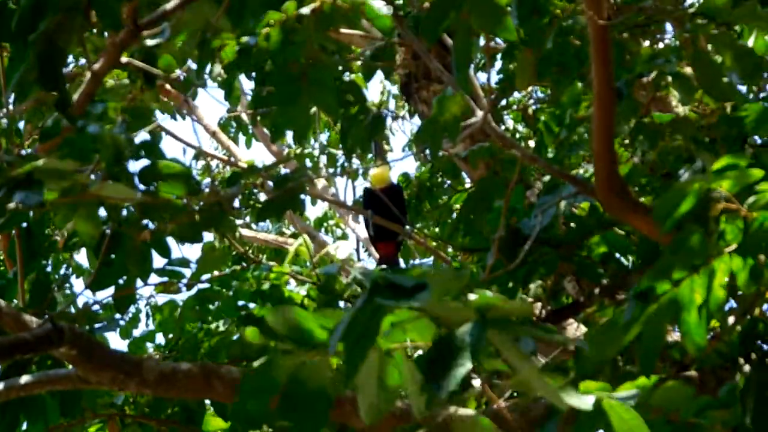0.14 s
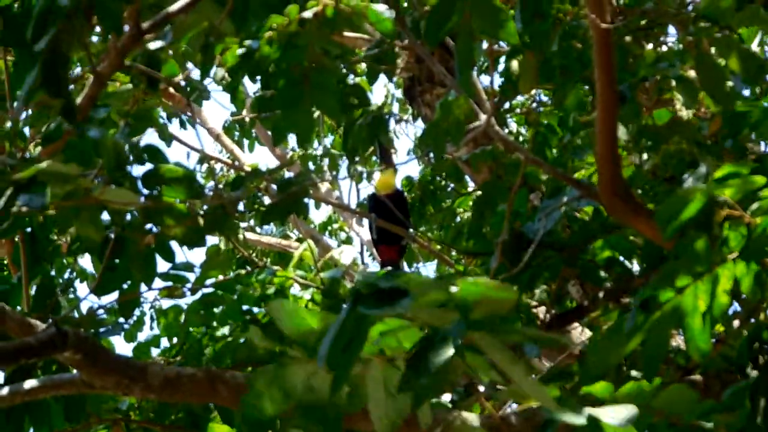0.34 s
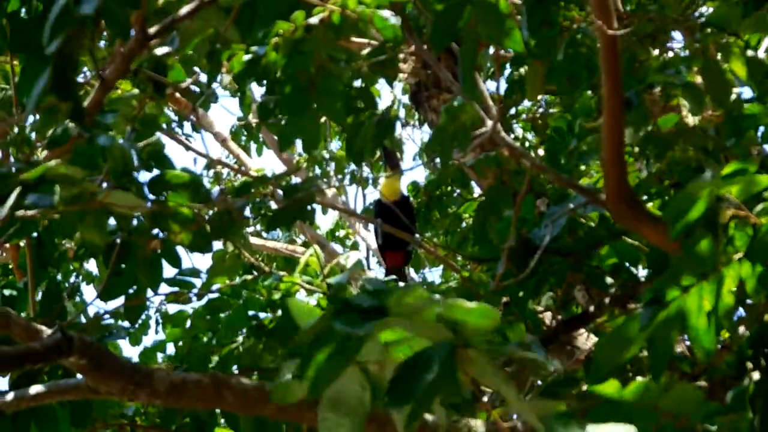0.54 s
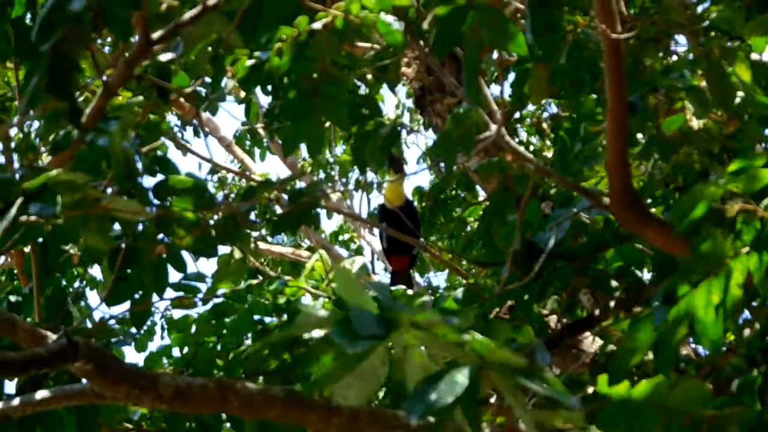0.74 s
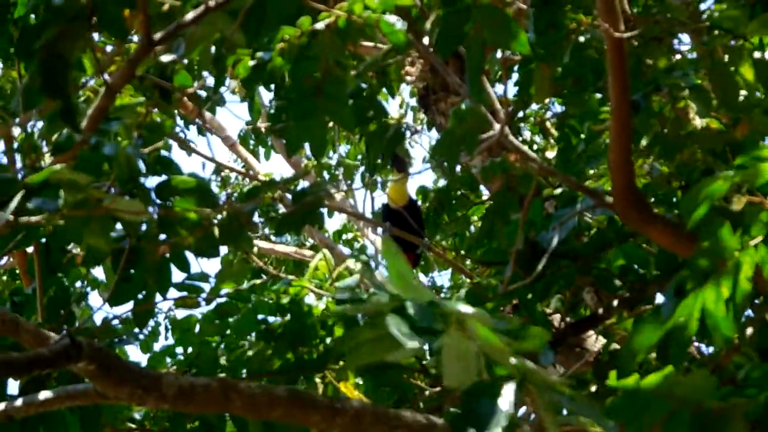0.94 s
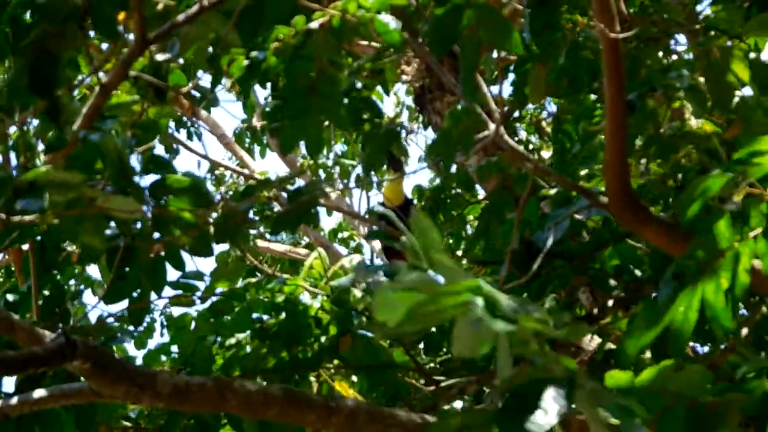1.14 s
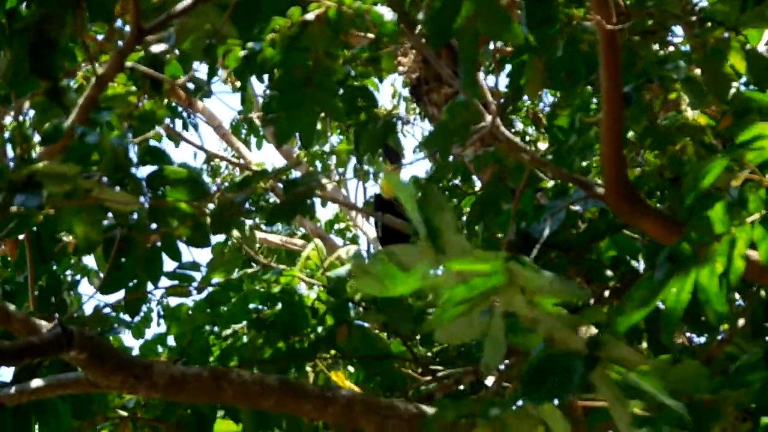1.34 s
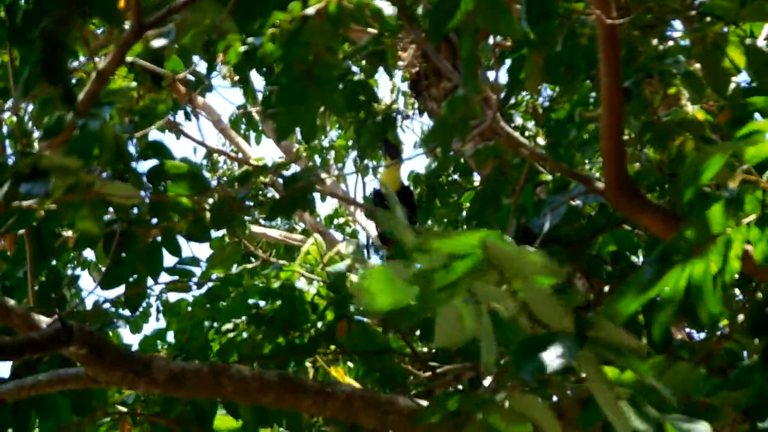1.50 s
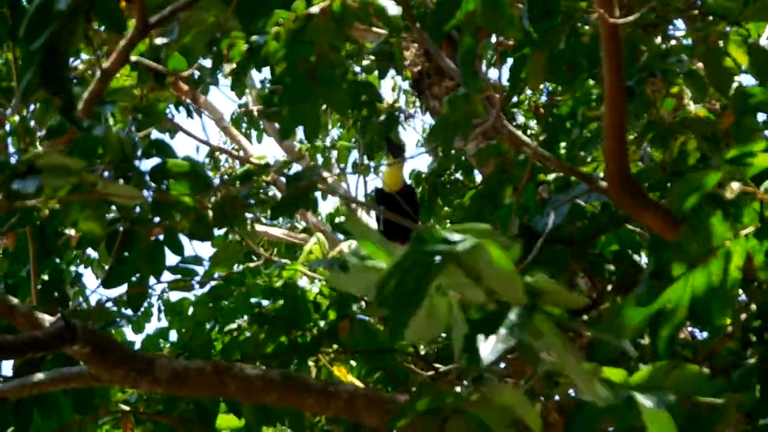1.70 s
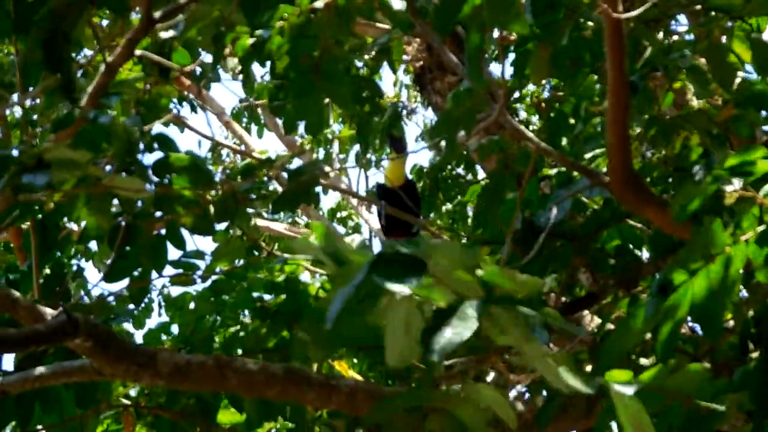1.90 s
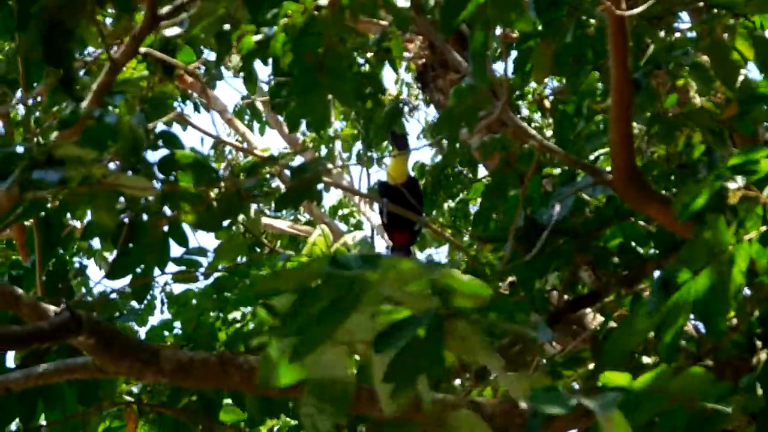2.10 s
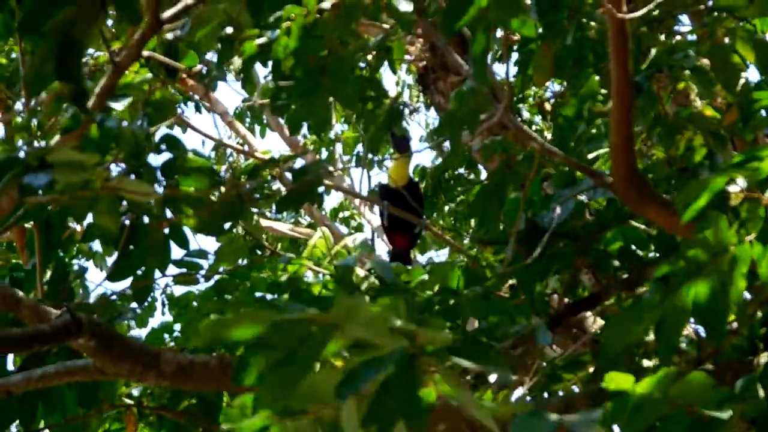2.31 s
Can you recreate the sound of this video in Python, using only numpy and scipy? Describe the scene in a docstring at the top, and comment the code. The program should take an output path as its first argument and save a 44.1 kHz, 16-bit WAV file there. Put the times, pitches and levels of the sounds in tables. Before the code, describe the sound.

A toucan gives one loud falling cry, then three short raspy yelps, echoing through trees.

```python
"""Toucan high in a tree

High above the microphones, one long falling cry and three short yelps: harmonic tones shaped by throat and bill.
Near trunks return delayed copies; leaves and forest answer with decaying noise.
Faint dry ticks and soft broadband swells, both filtered noise, sound along with and after the calls.
Behind: insects, hush and rumble made of coloured noise, far whistles and a low hum made of sines."""
import sys
import numpy as np
from scipy import signal
from scipy.fft import rfft, irfft, next_fast_len
from scipy.io import wavfile
from scipy.ndimage import uniform_filter1d, minimum_filter1d, map_coordinates

SR = 44100
rng = np.random.default_rng(int(sys.argv[2]) if len(sys.argv) > 2 else 0)


def persist_wave(psi):
    """Save psi, clipped to +-1, as 16-bit WAV."""
    counts = np.round(np.clip(psi, -1, 1) * 32767).astype(np.int16)
    wavfile.write(sys.argv[1], SR, np.atleast_2d(counts).T)


N = 103635  # length in samples


def amp(db):
    """Decibels to gain."""
    return 10 ** (np.asarray(db) / 20)


def unit(x):
    """Scale to rms 1."""
    return x / np.sqrt(np.mean(x ** 2) + 1e-20)


def along(points, hz):
    """Read (f/Hz, value) points on a log frequency axis."""
    f, v = np.transpose(points)
    return np.interp(np.log(hz + 1), np.log(f + 1), v)


def clock():
    """Seconds at each sample."""
    return np.arange(N) / SR


def curves(rows):
    """Interpolate each column after the time to one value per sample."""
    s, *columns = np.transpose(rows)
    return [np.interp(clock(), s, column) for column in columns]


def wobble(rate):
    """A smooth random curve with rate knots a second."""
    knots = rng.standard_normal(N // 8)
    return map_coordinates(knots, [clock() * rate], mode="mirror")


def filtered(x, response):
    """Multiply the spectrum of x by a complex response of frequency."""
    m = next_fast_len(N + SR // 2)  # spare length keeps late sound from wrapping round
    spectrum = rfft(x, m) * response(np.fft.rfftfreq(m, 1 / SR))
    return irfft(spectrum, m)[..., :N]


def shaped_noise(response):
    """One channel of coloured noise of rms 1."""
    return unit(filtered(rng.standard_normal(N), response))


def left_right(mid, side):
    """Two microphone channels from their common and opposed parts."""
    return np.array([mid + side, mid - side])


def stereo_noise(spectrum, alike):
    """Coloured noise of rms 1; the mid-side balance sets how alike the two microphones are."""
    def mid_side(hz):
        turn = np.arccos(np.clip(along(alike, hz), -1, 1)) / 2
        return spectrum(hz) * np.array([np.cos(turn), np.sin(turn)])

    mid, side = filtered(rng.standard_normal((2, N)), mid_side)
    return unit(left_right(mid, side))


# Gain of throat and bill at each overtone: f/Hz, gain/dB
THROAT_GAIN = [(1150, -2), (1550, 0), (1850, -1), (2500, -1), (3100, 0), (3650, -2), (4650, -16),
               (5500, -21), (6300, -30), (7400, -28), (8000, -33), (9200, -21), (11000, -24), (12500, -34),
               (15000, -42)]
# Colour of the air in the voice: f/Hz, relative level/dB
BREATH_COLOUR = [(200, -5), (700, -18), (1200, 0.5), (2200, -4), (3200, 1), (5500, 0.5), (7000, -3),
                 (10000, -14), (15000, -35)]
BREATH_DB, RASP_BREATH_DB = -32, -3  # air always present; air added per unit of roughness
JITTER, JITTER_RATE = .002, 500  # share of the pitch, knots per second
ROUGH_JITTER, ROUGH_JITTER_RATE = .012, 900  # the same, per unit of roughness
FLUTTER_DB, FLUTTER_RATE = 3.5, 90  # overtones above the octave: dB, knots per second


def syrinx(pitch, gain, octave_db, rough):
    """A harmonic tone shaped by throat and bill; its high overtones flutter, roughness adds jitter and air."""
    unsteadiness = JITTER * wobble(JITTER_RATE) + ROUGH_JITTER * rough * wobble(ROUGH_JITTER_RATE)
    pitch = pitch * (1 + unsteadiness)
    phase = 2 * np.pi * np.cumsum(pitch) / SR
    overtone_db = [0, octave_db] + [FLUTTER_DB * wobble(FLUTTER_RATE) for _ in range(6)]
    tone = np.zeros(N)
    for k, db in enumerate(overtone_db, 1):
        tone += amp(along(THROAT_GAIN, k * pitch) + db) * np.sin(k * phase)
    breath = shaped_noise(lambda hz: amp(along(BREATH_COLOUR, hz)))
    breath_gain = amp(BREATH_DB) + amp(RASP_BREATH_DB) * rough
    return gain * (np.sqrt(2) * tone + breath_gain * breath)


# Pitch of the long cry: t/s, f/Hz
CRY_PITCH = [(.194, 1780), (.21, 1837), (.229, 1836), (.239, 1740), (.25, 1712), (.263, 1608), (.29, 1566),
             (.342, 1557), (.361, 1508), (.376, 1452), (.392, 1219)]
# Loudness of the long cry before throat and bill: t/s, level/dB, octave over the fundamental/dB
CRY_LEVEL = [(.193, -33.5, 3.5), (.198, -28.5, -10), (.212, -1.5, -3.5), (.235, -16, 2),
             (.265, -13.5, -5.5), (.30, -9.5, -2), (.335, -28, -7), (.362, -4.5, -2), (.38, -28, 0),
             (.394, -34.5, -1)]


def cry():
    """The long call: a high start, a step down, a hold and a final slide."""
    pitch, = curves(CRY_PITCH)
    level_db, octave_db = curves(CRY_LEVEL)
    sounding = (clock() > CRY_LEVEL[0][0]) & (clock() < CRY_LEVEL[-1][0])
    smooth_pitch = uniform_filter1d(pitch, size=300)
    return syrinx(smooth_pitch, amp(level_db) * sounding, octave_db, rough=0)


# Short calls, levels before throat and bill: start t/s, length/s, starting f/Hz, level/dB,
# octave over the fundamental/dB, second tone over the level/dB, closing roughness (no unit)
YELPS = [(.459, .056, 1645, -16.5, 4, -40, .9), (.784, .042, 1590, -25, 7.5, -18, .8),
         (.892, .031, 1580, -23, 7.5, -32, 1.4)]
SAG, DROP, DROP_POWER = 0.0739, .18, 3.82  # steady fall and late plunge, shares of the pitch; plunge curve
START_DB, ATTACK_S, RELEASE_SHARE = -3, .004, .3  # softer first half; fade-in; closing share of the call
SECOND_TONE_RATIO = 1.47  # a second tone of the syrinx, over the pitch


def yelps():
    """Short calls that sag, then plunge and turn raspy as they close."""
    out = np.zeros(N)
    for start, length, hz, db, octave_db, second_db, rough in YELPS:
        u = np.clip((clock() - start) / length, 0, 1)  # progress through the call
        pitch = hz * (1 - SAG * u - DROP * u ** DROP_POWER)
        attack = np.minimum(u * length / ATTACK_S, 1)
        release = np.minimum((1 - u) / RELEASE_SHARE, 1)
        gain = amp(db + START_DB * np.clip(1 - 2 * u, 0, 1)) * attack * release
        second_phase = 2 * np.pi * SECOND_TONE_RATIO * np.cumsum(pitch) / SR
        second = np.sin(second_phase) * np.sin(np.pi * u ** 3)  # swells late in the call
        out += syrinx(pitch, gain, octave_db, rough * u ** 2)
        out += amp(db + second_db) * second
    return out


# Faint dry ticks: t/s, starting level/dB, centre f/Hz
TICKS = [(.165, -48, 2800), (.238, -33, 1300), (.290, -30, 1300), (.752, -48, 2500), (1.050, -39, 3000)]
TICK_T60_S = .02


def ticks():
    """Sudden bursts of band noise that die away exponentially."""
    out = np.zeros(N)
    for start, db, centre_hz in TICKS:
        age = clock() - start
        noise = shaped_noise(lambda hz: 1 / (1 + ((hz - centre_hz) / 900) ** 2))
        out += amp(db - 60 * np.abs(age) / TICK_T60_S) * (age > 0) * noise
    return out


# Soft broadband swells, one just after the long cry, a fainter one late: centre t/s, half width/s, level/dB
SWELLS = [(.425, .02, -41), (1.66, .035, -52)]
# Colour of the swells: f/Hz, relative level/dB
SWELL_COLOUR = [(150, 1), (300, -2), (700, 1), (2000, -5.5), (8000, 1.5), (14000, -28)]


def soft_swells():
    """Coloured noise that rises and falls in smooth bell shapes."""
    level = sum(amp(db) * np.exp(-((clock() - s) / width) ** 2) for s, width, db in SWELLS)
    return level * shaped_noise(lambda hz: amp(along(SWELL_COLOUR, hz)))


def arrival(x, delay, left_lag):
    """One path to the two microphones, a pure delay at each; a positive lag reaches the left one later."""
    delays = delay + np.array([[left_lag], [-left_lag]]) / 2
    return filtered(x, lambda hz: np.exp(-2j * np.pi * hz * delays))


ECHO_ALIKE = 0.37  # left-right likeness of the scattered sound


def scatter(x, t60, onset_s):
    """Convolve x with noise that builds up, then decays at each frequency's own t60."""
    hz, t, z = signal.stft(rng.standard_normal((2, SR)), SR, nperseg=256)
    decay = amp(-60 * t / t60(hz)[:, None])
    onset = 1 - np.exp(-t / onset_s)
    tail = signal.istft(z * decay * onset, SR, nperseg=256)[1]
    turn = np.arccos(np.clip(ECHO_ALIKE, -1, 1)) / 2
    mid, side = tail / np.linalg.norm(tail[0]) * [[np.cos(turn)], [np.sin(turn)]]
    return signal.fftconvolve(x[None], left_right(mid, side), axes=1)[:, :N]


# Treble lost straight down from the raised bill: f/Hz, gain/dB
BILL_AWAY = [(3300, 0), (4700, -3), (8000, -5), (13000, -6)]
# Echoes from near trunks: delay t/s, level/dB, left lag t/s
TRUNKS = [(.0072, -10.5, -0.00047), (.0125, -8, -0.0158), (.019, -30, .0002), (0.055, -29.5, -.0001),
          (.076, -19.5, .0001)]
# Ring of the forest: f/Hz, t60/s
FOREST_T60 = [(500, 0.58), (1500, 0.79), (3200, 0.79), (6000, 1), (12000, 0.82)]
LEFT_DB = 1.3  # the direct sound gains this at the left microphone and loses it at the right
LEAVES_DB, LEAVES_T60_S, FOREST_DB = -5.5, .22, -15


def toucan():
    """The calls: direct, thrown back by trunks, scattered by leaves, then the forest's ring."""
    # the ticks and swells share the paths of the calls
    near = cry() + yelps() + ticks() + soft_swells()
    direct = filtered(near, lambda hz: amp(along(BILL_AWAY, hz))) * amp([[LEFT_DB], [-LEFT_DB]])
    trunks = sum(amp(db) * arrival(near, delay, lag) for delay, db, lag in TRUNKS)
    leaves = scatter(near, lambda hz: np.full_like(hz, LEAVES_T60_S), onset_s=0.0031)
    forest = scatter(near, lambda hz: along(FOREST_T60, hz), onset_s=0.018)
    return direct + trunks + amp(LEAVES_DB) * leaves + amp(FOREST_DB) * forest


# Bands of the insect chorus: centre f/Hz, half width/Hz, level/dB
INSECTS = [(7340, 180, -56), (7650, 100, -57.5), (7620, 33, -62)]
INSECT_WAVER_DB, INSECT_WAVER_RATE = 1.2, 12  # dB, knots per second


def insects():
    """A far chorus shrilling: narrow bands of noise that waver in level."""
    out = np.zeros((2, N))
    for hz, width, db in INSECTS:
        level = amp(db + INSECT_WAVER_DB * wobble(INSECT_WAVER_RATE))
        out += level * stereo_noise(lambda f: 1 / (1 + ((f - hz) / width) ** 2), [(7500, 0.37)])
    return out


# Far whistles: start t/s, length/s, first f/Hz, last f/Hz, level/dB
WHISTLES = [(-.05, .13, 405, 410, -53.5), (-.02, 0.23, 815, 944, -61), (1.959, 0.68, 1344, 1298, -63)]


def whistles():
    """Faint gliding sines from far off, slightly unsteady in pitch and level."""
    out = np.zeros(N)
    for start, length, first_hz, last_hz, db in WHISTLES:
        u = np.clip((clock() - start) / length, 0, 1)
        glide = first_hz + (last_hz - first_hz) * u
        pitch = glide * (1 + 0.0018 * wobble(41))
        swell = np.sqrt(2 * np.abs(np.sin(np.pi * u)))
        out += amp(db + 1.2 * wobble(18)) * swell * np.sin(2 * np.pi * np.cumsum(pitch) / SR)
    return out


# Colour of the outdoor hush: f/Hz, relative level/dB
HUSH_COLOUR = [(25, -1), (60, -3.5), (90, -11), (180, -8), (300, -9.5), (700, -12.5), (1300, -14),
               (2500, -13.5), (6000, -14), (9000, -15), (13000, -23), (15000, -23), (15600, -48)]
# How alike the hush is at the two microphones: f/Hz, likeness (no unit)
HUSH_ALIKE = [(60, 0.92), (200, 0.99), (550, 0.96), (1600, 0.29), (5000, 0.15), (14000, 0.55)]
HUSH_DB = -47
HUSH_LAG_S = -0.000094  # the hush reaches the left microphone first


def hush():
    """Outdoor hush: coloured noise, nearly steady in level."""
    noise = stereo_noise(lambda hz: amp(along(HUSH_COLOUR, hz)), HUSH_ALIKE)
    return amp(HUSH_DB + 0.6 * wobble(4.8)) * arrival(noise, 0, HUSH_LAG_S)


# Level of the rumble: t/s, level/dB
RUMBLE_LEVEL = [(0, -45.5), (.3, -53.5), (.5, -49), (.7, -56), (1.02, -52.5), (1.2, -52.5), (2.35, -62.5)]
# Colour of the rumble: f/Hz, relative level/dB
RUMBLE_COLOUR = [(25, 3), (60, 0), (130, -16.5), (250, -8), (400, -27), (900, -32)]


def rumble():
    """Unsteady rumble of air: low noise that rises and falls."""
    level_db, = curves(RUMBLE_LEVEL)
    noise = stereo_noise(lambda hz: amp(along(RUMBLE_COLOUR, hz)), [(40, 0.67)])
    return amp(level_db + wobble(7.2)) * noise


def hum():
    """A low steady sine."""
    hum_hz, hum_db = 117.6, -60
    return np.sqrt(2) * amp(hum_db) * np.sin(2 * np.pi * hum_hz * clock())


def scene():
    """The bird over its surroundings."""
    return toucan() + insects() + whistles() + hush() + rumble() + hum()


LIMIT, LIMIT_HOLD_S = .56, .008  # peak level (full scale 1), span of the gain dip
TOP_HZ = 15700


def record(dry):
    """The camera limits the loudest peaks, both channels alike, then cuts all above its band limit."""
    hold = int(LIMIT_HOLD_S * SR)
    needed = np.minimum(1, LIMIT / (np.abs(dry).max(axis=0) + 1e-9))
    gain = uniform_filter1d(minimum_filter1d(needed, size=hold), size=hold)
    return filtered(dry * gain, lambda hz: hz < TOP_HZ)


dry = scene()
out = record(dry)
persist_wave(out)
```